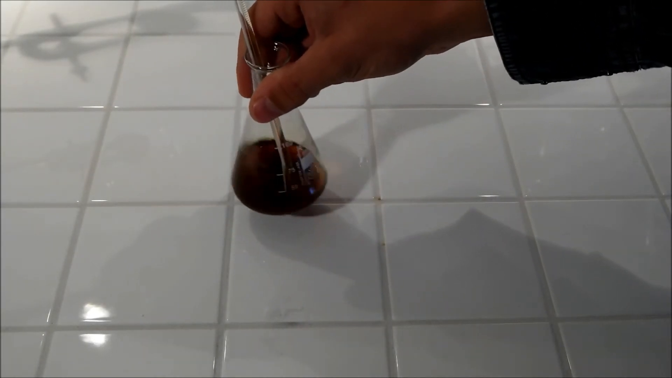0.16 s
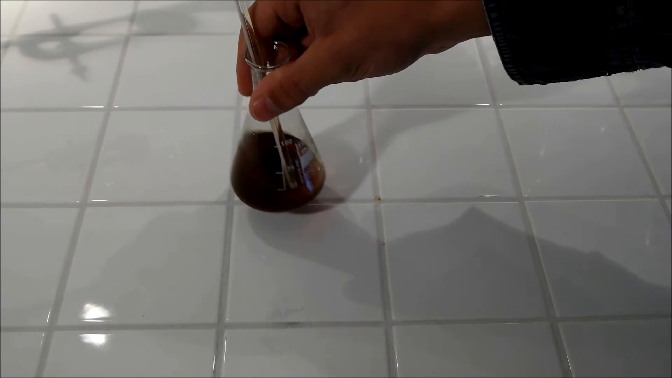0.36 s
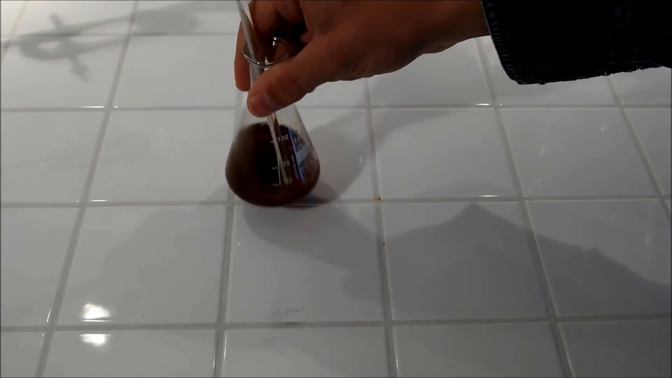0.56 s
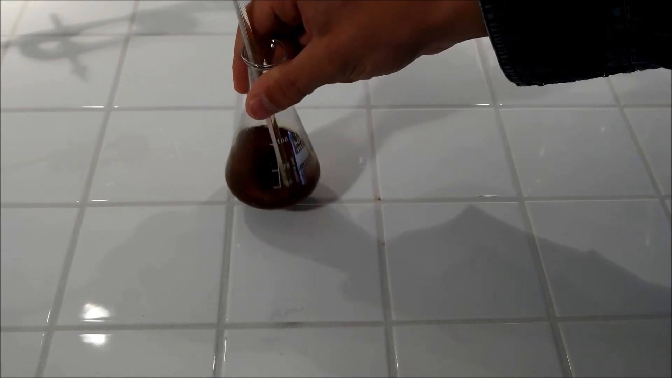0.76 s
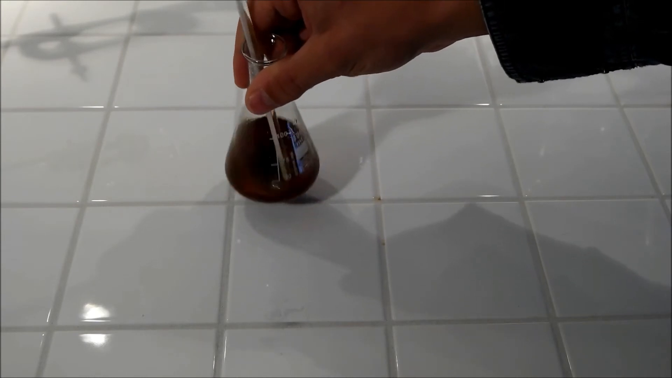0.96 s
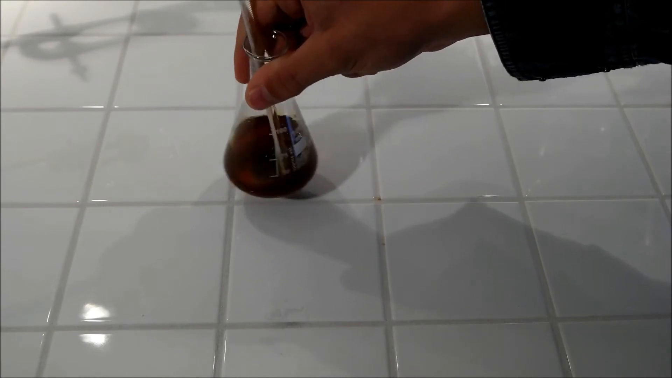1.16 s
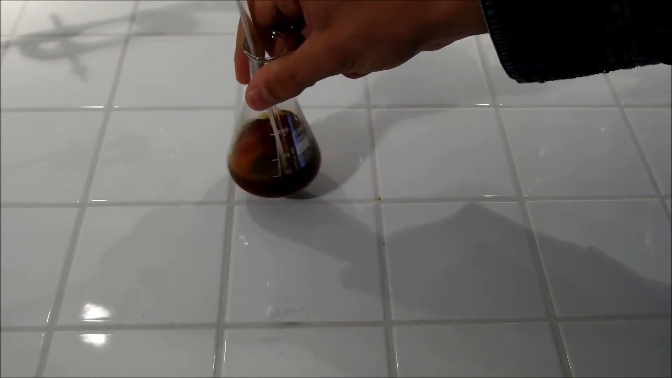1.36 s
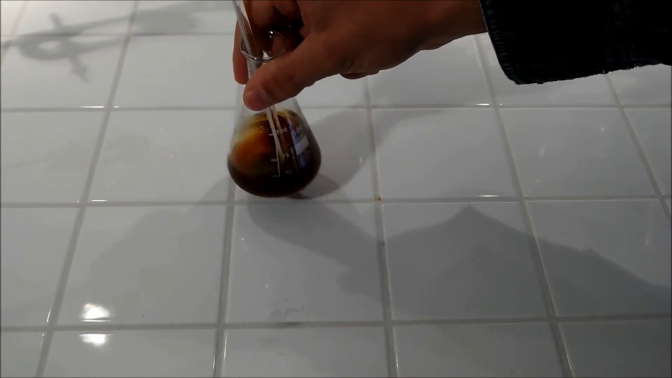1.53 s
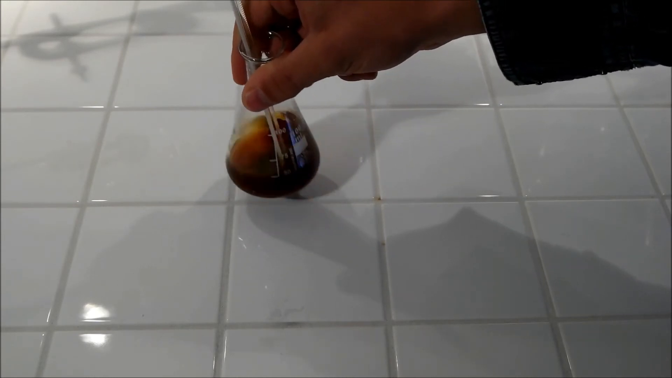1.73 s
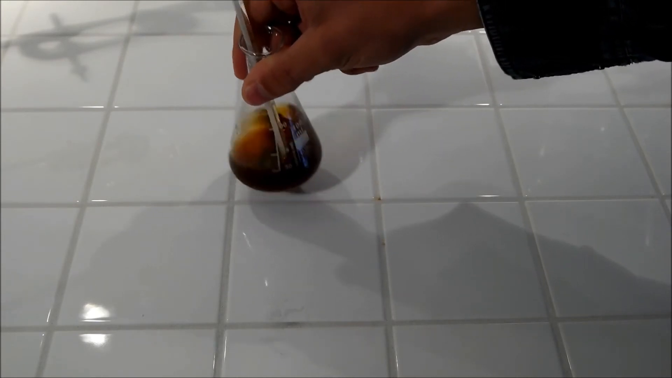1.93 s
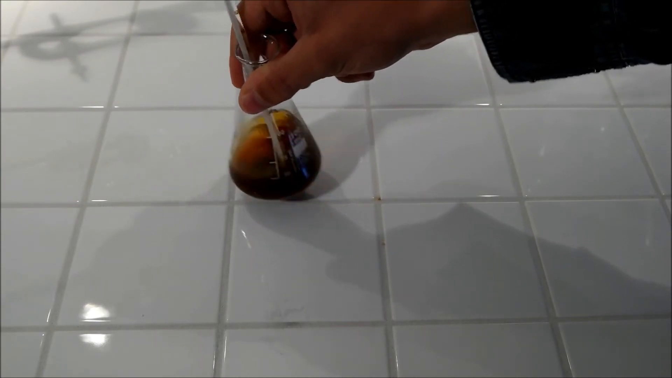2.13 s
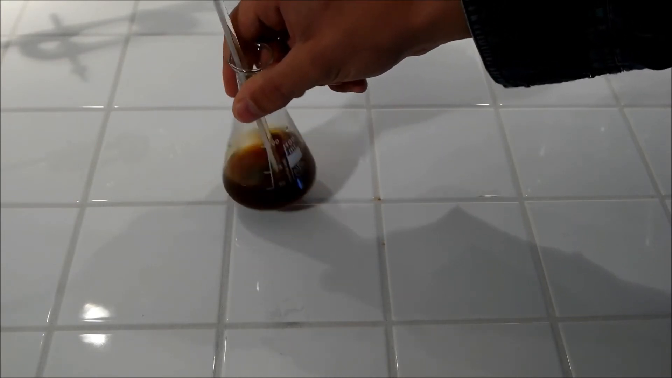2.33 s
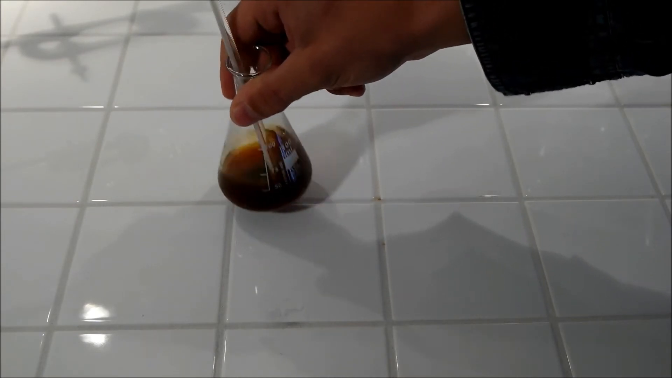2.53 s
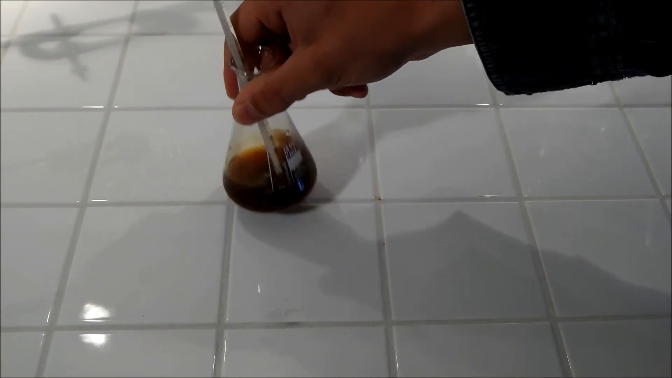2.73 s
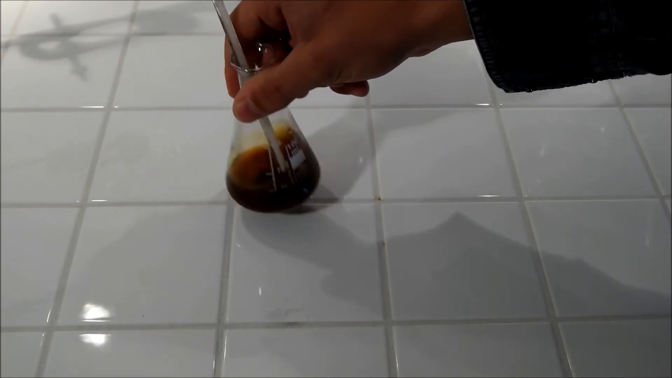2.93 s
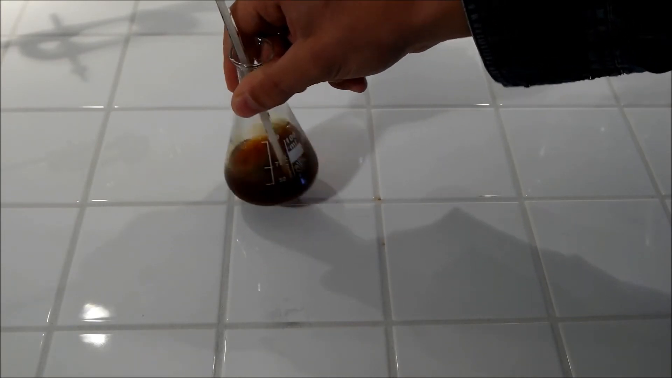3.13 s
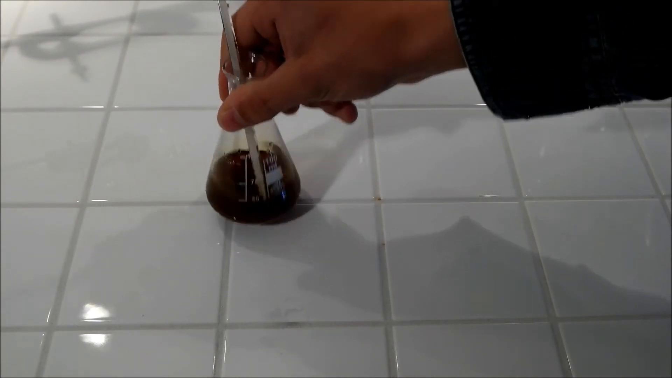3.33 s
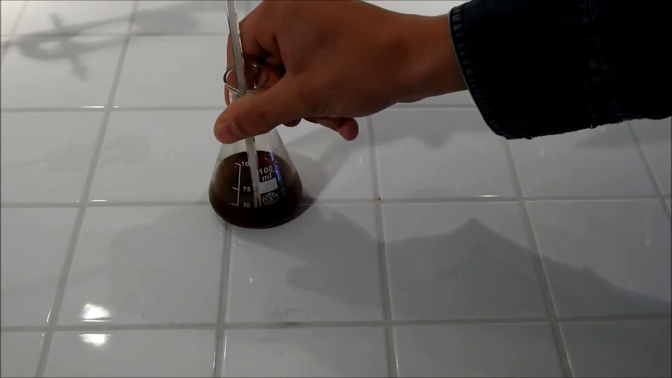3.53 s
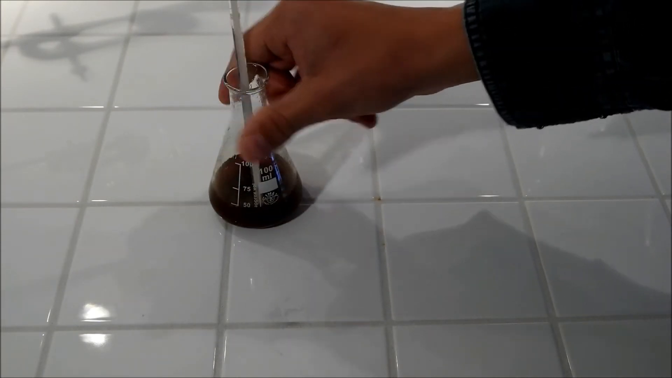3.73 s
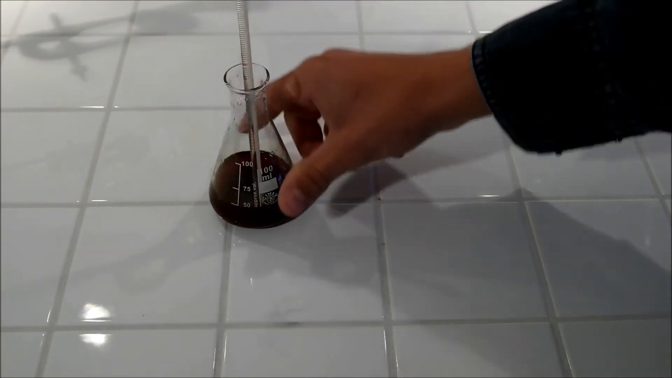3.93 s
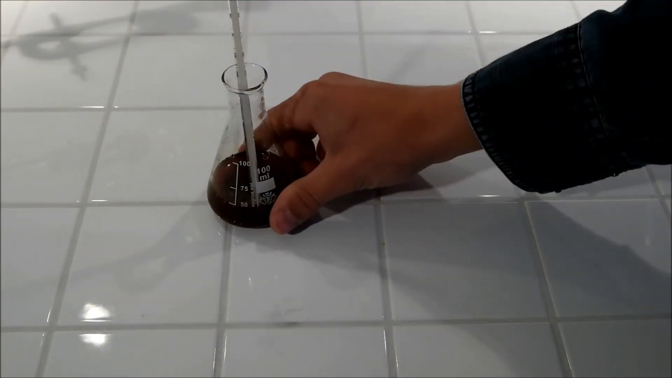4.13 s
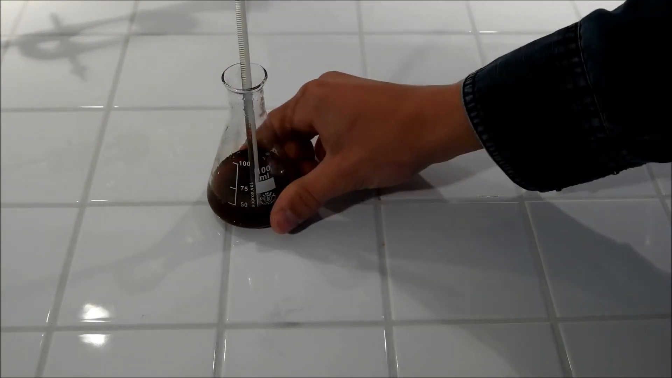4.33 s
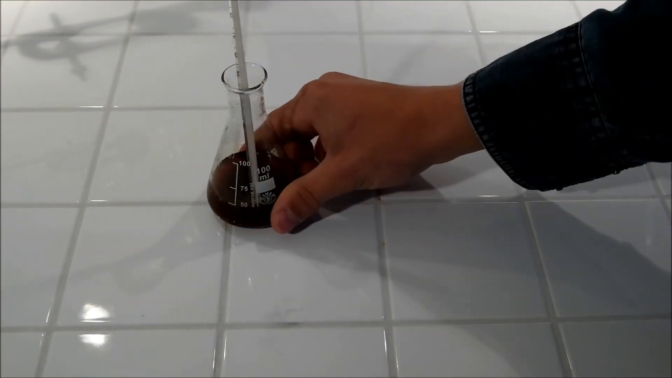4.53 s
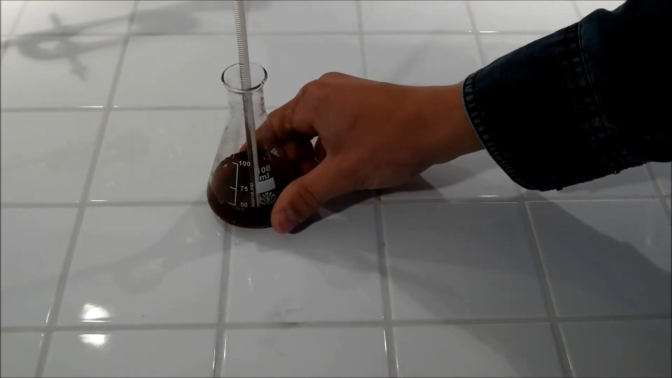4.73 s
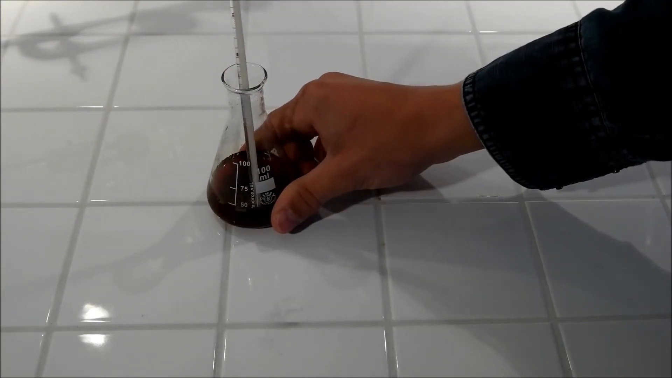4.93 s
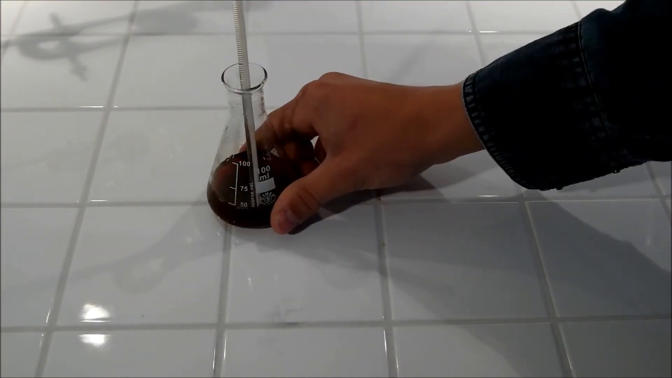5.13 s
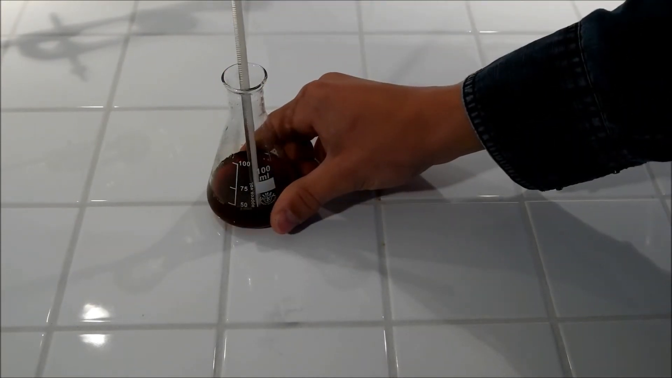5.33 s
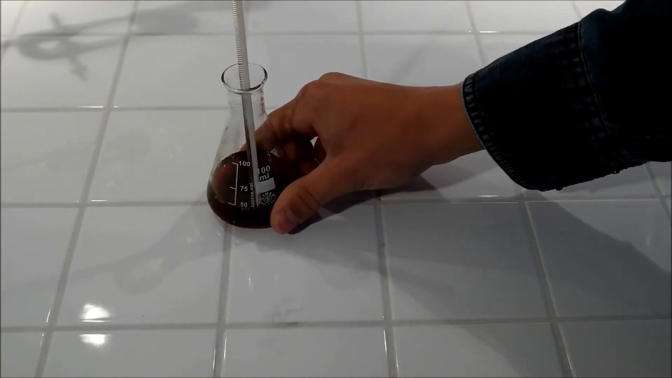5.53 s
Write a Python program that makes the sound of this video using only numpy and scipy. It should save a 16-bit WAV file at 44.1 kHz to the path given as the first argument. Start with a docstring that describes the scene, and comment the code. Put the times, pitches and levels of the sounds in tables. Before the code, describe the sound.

Small, bright glass-on-glass ticks come unevenly over quiet air noise and soft lapping liquid. Just before the middle they become firmer and more spaced, then a hard knock of glass base on tile dominates, followed by lighter taps and rim chatter. After that nothing is handled; a steady fan rush and faint hum fade slightly at the end. Close stereo pickup in a reflective room.

```python
"""A glass thermometer clinks against a conical flask of swirled liquid: bright contact bursts and short wall modes.
The flask is set down on a tiled lab bench: coloured knocks, ringing modes, a bench thump and a rolling rattle.
Flask and liquid plink as short sines rising slightly in pitch; the liquid sloshes as noise of uneven level.
A ventilation fan sounds as coloured noise over wavering hum lines.
The hard-walled room answers the contacts and plinks through a noise-built echo."""
import sys
import numpy as np
from scipy import signal
from scipy.fft import rfft, irfft, next_fast_len
from scipy.io import wavfile
from scipy.ndimage import uniform_filter1d

SR = 44100
rng = np.random.default_rng(int(sys.argv[2]) if len(sys.argv) > 2 else 0)


def store_wav(level_fs):
    """Save 16-bit WAV to argv[1]."""
    pcm = np.round(np.clip(np.atleast_2d(level_fs), -1, 1) * 32767)
    wavfile.write(sys.argv[1], SR, pcm.T.astype(np.int16))


N = 250309
FFT_SIZE = next_fast_len(N)
SWIRL_END_S = 1.4

# Flask base against the tiles. Each row: start in seconds, relative strength in dB, chatter length in seconds.
KNOCKS = [(3.5281, -7.5, 0.00008), (3.5301, -5, 0.00015), (3.531, -5.5, 0.0026), (3.5509, -21.5, 0.0079),
          (3.6427, -13.5, 0.009), (3.6504, -19.5, 0.008), (3.7826, -26, 0.0063), (3.8215, -25, 0.006),
          (3.841, -24, 0.012)]
# Colour of base on tile. Each row: frequency in Hz, relative density in dB per Hz.
THUD = [(40, -23.5), (150, -22.5), (260, -12.5), (400, -3), (520, -2), (660, -3.5), (820, -1), (1250, 0.5),
        (1500, -2), (1950, 2), (2700, 1), (3300, -5), (4200, -7.5), (5400, -16.5), (6700, -16.5),
        (7800, -22.5), (11000, -30), (12700, -41.5), (15500, -62)]
# Left-right likeness of contacts and steady noises. Each row: frequency in Hz, likeness from 0 to 1.
ALIKE = [(30, 0.97), (100, 0.26), (300, 0.399), (700, 0.42), (1300, 0.6), (2500, 0.2), (6000, 0.097),
         (14000, 0.23)]


def amp(db):
    """Decibels to gain."""
    return 10 ** (np.asarray(db) / 20)


def unit(x):
    """Scales to an rms of one."""
    return x / np.sqrt(np.mean(x ** 2) + 1e-20)


def read(points, hz):
    """Reads a table on a logarithmic frequency axis."""
    f, value = np.transpose(points)
    return np.interp(np.log(hz + 1), np.log(f + 1), value)


def add(mix, s, sound):
    """Adds a sound to the mix at time s."""
    part = mix[..., round(s * SR):][..., :sound.shape[-1]]
    part += sound[..., :part.shape[-1]]


def hold(db, until_s, fall_db_per_s):
    """Gain over the whole scene: a steady level, then an even fall in dB."""
    past_s = np.maximum(np.arange(N) / SR - until_s, 0)
    return amp(db - fall_db_per_s * past_s)


def pair(points, size):
    """Frequencies and spectra of two white noises, left and right as alike as the table says."""
    hz = np.fft.rfftfreq(size, 1 / SR)
    left, other = rfft(rng.standard_normal((2, size)))
    alike = np.clip(read(points, hz), -1, 1)
    right = other * np.sqrt(1 - alike ** 2) + left * alike
    return hz, np.array([left, right])


def even_burst(envelope, points, evenness, count=4):
    """Stereo noise under an envelope, its chance resonances partly smoothed out."""
    size = len(envelope)
    burst = irfft(pair(points, size)[1], size) * envelope
    energy = np.linalg.norm(burst)
    for _ in range(count):
        z = rfft(burst)
        flatter = z / (abs(z) + 1e-9) ** np.clip(evenness, 0, 1)
        burst = irfft(flatter, size) * envelope ** (1 / count)
    return burst * energy / np.linalg.norm(burst)


def pulse(colour, tilt_db_per_octave, pivot_hz, size=2048):
    """A minimum-phase click of unit energy with the given colour, tilted about the pivot."""
    hz = np.fft.rfftfreq(size, 1 / SR)
    octaves = np.log2(np.maximum(hz, pivot_hz / 10) / pivot_hz)
    log_gain = np.log(amp(read(colour, hz) + tilt_db_per_octave * octaves))
    circle = np.r_[log_gain, log_gain[-2:0:-1]]
    spectrum = np.exp(np.conj(signal.hilbert(circle)))
    click = np.fft.ifft(spectrum).real[:size // 2]
    return click / np.linalg.norm(click)


def contact(length_s, chatter_db, apart, evenness, size=2048):
    """Force of a first touch, then a dying buzz of rebounds that differs a little from side to side."""
    t = np.arange(size) / SR
    envelope = np.exp(-(t / max(length_s, 1e-4)) ** 2)
    buzz = even_burst(envelope, ALIKE, evenness)
    force = amp(chatter_db) * (apart * buzz + (1 - apart) * buzz.mean(0))
    force[:, 0] += 1
    return force


def strike(force, click):
    """A contact force played through the colour of the object, with unit energy on each side."""
    burst = signal.fftconvolve(force, click[None], axes=1)
    return burst / np.linalg.norm(burst, axis=1, keepdims=True)


def ring(modes, damping_per_s, spread_rad, detune):
    """Decaying modes with added damping; pitch and strength shift at random from blow to blow."""
    t = np.arange(SR // 2) / SR
    out = np.zeros((2, len(t)))
    for hz, db, t60 in modes:
        shift, uneven_db, side, phase = rng.standard_normal(4)
        turns = hz * (1 + detune * shift) * t + phase
        angle = 2 * np.pi * turns + spread_rad * side * np.array([[-1], [1]])
        decay = np.exp(-np.log(1000) * t * (1 / t60 + damping_per_s))
        out += amp(db + uneven_db) * decay * np.sin(angle)
    return out * (1 - np.exp(-t / 0.00044))


def diffused(response):
    """Evens out a one-second echo over frequency, so that no single resonance booms; keeps 0.75 s."""
    z = rfft(response)
    power = (abs(z) ** 2).mean(0)
    correction = np.sqrt(uniform_filter1d(power, size=700) / uniform_filter1d(power, size=70))
    return irfft(z * correction, SR)[:, :SR - SR // 4]


def room(x, wet_db, tilt_db, early_db=-4.5, early_s=0.016, build_s=0.0035):
    """Close reflections, then a diffuse tail that decays at a rate set by frequency."""
    # Each row: frequency in Hz, t60 in s.
    room_t60 = [(120, 0.97), (330, 0.18), (600, 0.38), (1500, 0.55), (4000, 0.43), (8000, 0.32),
                (13000, 0.5)]
    # Each row: frequency in Hz, relative reverberation level in dB.
    room_db = [(120, 5), (300, 7), (650, 3.5), (1200, -1), (2500, -7), (6000, -5.5), (12000, -13.5)]
    # Left-right likeness of the echo. Each row: frequency in Hz, likeness from 0 to 1.
    room_alike = [(100, .95), (350, 0.7), (800, 0.7), (1500, 0.4), (2500, .25), (14000, 0.1)]
    t = np.arange(SR) / SR
    noise = irfft(pair(room_alike, SR)[1], SR)
    hz, frame_s, z = signal.stft(noise, SR, nperseg=256)
    rate = np.log(1000) / read(room_t60, hz)[:, None]
    colour_db = read(room_db, hz) + tilt_db * np.log2(1 + hz / 2000)
    # the root evens the energy of long and short decays
    z = z * np.exp(-rate * frame_s) * np.sqrt(2 * rate / SR) * amp(colour_db)[:, None]
    tail = signal.istft(z, SR, nperseg=256)[1][:, :SR] * (1 - np.exp(-t / build_s))
    early = even_burst(np.exp(-t / early_s) * (t > .001), room_alike, evenness=0.94)
    early = early / np.linalg.norm(early, axis=1, keepdims=True)
    response = diffused(tail + amp(early_db) * early)
    return amp(wet_db) * signal.fftconvolve(x, response, axes=1)[:, :N]


def ventilation(waver_rad=0.89):
    """Rushing air as coloured noise over phase-wavering hum lines; steady, then fading at the end."""
    # Air noise. Each row: frequency in Hz, relative density in dB per Hz.
    air_colour = [(20, 0.6), (48, 0.86), (70, -3), (160, -.7), (350, -1.8), (560, 0), (750, -7.5),
                  (1050, -7.5), (1290, 1.69), (1480, -8.7), (3000, -11.7), (6000, -15.5), (14000, -24),
                  (16000, -44)]
    # Hum lines. Each row: frequency in Hz, rms level before the fade in dB.
    hum_lines = [(49, -69.5), (99, -73.5), (255, -79), (299, -71.5), (446, -72.5), (585, -73)]
    hz, z = pair(ALIKE, FFT_SIZE)
    t = np.arange(N) / SR
    swell = hold(-58, until_s=5.01, fall_db_per_s=9)
    hum = np.zeros(N)
    for line_hz, db in hum_lines:
        slow = rfft(rng.standard_normal(FFT_SIZE)) * np.exp(-hz / 3)
        drift = unit(irfft(slow, FFT_SIZE)[:N])
        hum += amp(db) * np.sqrt(2) * np.sin(2 * np.pi * line_hz * t + waver_rad * drift)
    air = unit(irfft(z * amp(read(air_colour, hz)), FFT_SIZE)[:, :N])
    return (air + hum / swell.max()) * swell


def slosh(lapping_db=3):
    """Liquid laps as unevenly swelling noise: steady in the swirl, then calming, jolted by the landing."""
    # Each row: frequency in Hz, relative density in dB per Hz.
    liquid_colour = [(100, -22.5), (280, -21), (480, 4.5), (800, -11.5), (1800, -22.5), (4000, -13),
                     (10000, -12.5), (15000, -35.5)]
    hz, z = pair(ALIKE, FFT_SIZE)
    laps = uniform_filter1d(rng.standard_normal(N), size=1200)
    laps = unit(uniform_filter1d(laps, size=800))
    landing_s = KNOCKS[0][0]
    swirl = hold(-69.5, SWIRL_END_S, fall_db_per_s=32)
    jolt = hold(-62.5, landing_s, fall_db_per_s=13.5) * (np.arange(N) / SR > landing_s)
    noise = irfft(z * amp(read(liquid_colour, hz)), FFT_SIZE)[:, :N]
    return unit(noise * amp(lapping_db * laps)) * (swirl + jolt)


def plinks(rise=0.0058, scatter_db=6):
    """Short plinks, rising slightly in pitch, from the swirled flask and its liquid; faint ones at random."""
    # The loudest plinks. Each row: start in seconds, initial pitch in Hz, relative level in dB.
    loudest = [(.248, 462, -41), (.255, 706, -41.5), (0.2688, 2870, -29.5), (.2705, 2320, -35),
               (0.513, 4270, -42), (.536, 6470, -50), (.741, 1590, -46.5), (1.166, 2850, -41),
               (1.5608, 2880, -39.5), (1.564, 3550, -48), (1.58, 6250, -50), (1.588, 1556, -41),
               (1.619, 1580, -54), (1.9835, 1730, -41), (2.0805, 6300, -43.5), (2.195, 2880, -41.5),
               (3.256, 2900, -49)]
    faint_per_s, faint_max_db, low_hz, high_hz = 3, -58, 1470, 6850
    t60_at_1khz_s, damping_power = 0.039, 0.55  # higher ones die sooner
    out, t = np.zeros((2, N)), np.arange(SR // 8) / SR
    faint = []
    for when, high, weak in rng.random((round(faint_per_s * SWIRL_END_S), 3)):
        pitch_hz = low_hz * (high_hz / low_hz) ** high
        faint.append((when * SWIRL_END_S, pitch_hz, faint_max_db - scatter_db * weak))
    for s, hz, db in loudest + faint:
        t60 = t60_at_1khz_s * (1000 / hz) ** damping_power
        turns = hz * (t + rise * t ** 2 / t60)
        envelope = np.exp(-np.log(1000) * t / t60) * (1 - np.exp(-turns / 2))
        add(out, s, amp(db) * np.sin(2 * np.pi * turns) * envelope)
    return out


def rattle(rattle_db=4):
    """The base rolls on its rim: a dense, fading run of tiny contacts with the tile."""
    # Each row: start in seconds, length in seconds, relative strength in dB.
    rolls = [(3.547, .09, -25.5), (3.654, .12, -27.5), (3.821, 0.063, -27.5)]
    rate_per_s, scatter_db, fade_db = 160, 5, -9
    out, click = np.zeros((2, N)), pulse(THUD, 0, pivot_hz=1950)
    for start, length, db in rolls:
        steps = np.arange(0, length, 1 / rate_per_s)
        for step, (jitter, uneven) in zip(steps, rng.standard_normal((len(steps), 2))):
            level_db = rattle_db + db + fade_db * step / length + scatter_db * uneven
            force = contact(0.00088, chatter_db=-4, apart=0.34, evenness=.3)
            add(out, start + step + .5 * jitter / rate_per_s, amp(level_db) * strike(force, click))
    return out


def flask(thud_db=14, ring_db=-27, bench_db=-8.5):
    """The base knocks on the tiles, duller when softer; modes ring and the first knock thumps the bench."""
    # Ringing of base, tile and room after a knock. Each row: frequency in Hz, relative level in dB, t60 in s.
    knock_modes = [(375.6, -13.5, .35), (472, -14, 0.22), (595, -15.5, .3), (713, -8, 0.2),
                   (850, -13, 0.24), (1004, -8.5, .24), (1268, -10.5, 0.32), (1337, -12, 0.23),
                   (1630, -10.5, .18), (1966, 3.5, 0.046), (2270, -3, 0.06), (2610, -6, .05),
                   (2790, -8, .12), (2939, -6.5, 0.11)]
    # Bench top. Each row: frequency in Hz, relative density in dB per Hz.
    bench_colour = [(30, -22), (85, -21), (150, -2), (200, -13), (280, 2.5), (370, 3.5), (500, 3.5),
                    (650, -11.5), (2000, -44.5), (16000, -84.5)]
    out = np.zeros((2, N))
    for s, db, length_s in KNOCKS:
        force = contact(length_s, chatter_db=-9.5, apart=0.27, evenness=0.32)
        click = pulse(THUD, 0.64 + 0.099 * db, pivot_hz=1963)
        add(out, s, amp(db + thud_db) * strike(force, click))
        add(out, s, amp(db + ring_db) * ring(knock_modes, 0, spread_rad=0.12, detune=0.0014))
    add(out, KNOCKS[0][0], amp(bench_db) * pulse(bench_colour, 0, pivot_hz=200, size=8192))
    return out


def favoured(hz):
    """The wall modes as struck at one spot: those near the given pitch are lifted."""
    # Flask wall, damped by the liquid. Each row: frequency in Hz, relative level in dB, t60 in s.
    wall_modes = [(1632, -20, .06), (1882, -10, .04), (2450, -10, 0.023), (2904, -4.5, 0.056),
                  (3250, -10, .03), (3698, -15, .1), (4050, -4.5, 0.079), (4130, -4, 0.044),
                  (4230, -3.5, .1), (4260, -6.5, .11), (4366, -3, .24), (4424, -4, .19), (4600, -2.5, .05),
                  (4720, -3, 0.043), (4810, -7, 0.038), (5400, -5.5, .025), (5660, -9, .08),
                  (5860, -11.5, 0.073), (6460, -9.5, 0.1), (6400, -11, 0.16), (6660, -12, .2),
                  (7160, -12.5, .06), (9900, -8.5, .08), (10690, -10.5, .05), (11600, -10, 0.12)]
    lift_db, width_hz = 11.5, 160
    return [(f, db + lift_db * np.exp(-((f - hz) / width_hz) ** 2), t60) for f, db, t60 in wall_modes]


def thermometer(tick_db=17.0, wall_db=-11.5, swirl_detune=0.005, rest_detune=0.00029):
    """Glass chatters on glass: a bright tick and a wall ring, damped and detuned while held in the hand."""
    # Clinks; the tick at 0.298 s is probably a bursting bubble or a drop. Each row: start in seconds,
    # relative strength in dB, wall ring relative to the tick in dB, pitch favoured by the spot in Hz.
    clinks = [(0.2688, -39, -2, 3150), (.298, -47.5, 14, 5400), (0.3072, -32.5, 3, 10000),
              (0.761, -52, -15, 4400), (0.948, -48.5, 10.5, 4780), (1.1179, -40, -1, 1880),
              (1.1593, -42, -2, 4850), (1.3714, -26.5, -1, 5830), (1.3804, -33.5, 1, 1880),
              (1.539, -41.5, 0, 10690), (1.588, -41.5, -10, 1630), (1.7601, -36.5, -2, 1880),
              (1.811, -55, 8, 6300), (1.951, -40, -10, 4280), (2.168, -49.5, -16, 4400),
              (2.181, -54, 2, 10000), (2.2006, -42.5, 2, 10000), (2.2852, -53, -8, 4430),
              (2.6062, -27, -1, 1880), (2.732, -55, 3.5, 4360), (2.8243, -22, 2, 3943),
              (3.01, -22.5, -3, 6500), (3.171, -30.5, -6, 4200), (3.212, -40.5, 7, 4140),
              (3.4423, -41, -0.5, 4110), (3.529, -29.5, -5.5, 4135), (3.567, -38, -2.5, 6660),
              (3.645, -38, 9, 6620), (3.653, -39, 7, 4230), (3.8, -44.5, 1, 6800), (3.839, -41, 3, 6830),
              (3.843, -35, -0.5, 4430)]
    # Each row: frequency in Hz, relative density in dB per Hz.
    tick_colour = [(150, -25), (450, -10.5), (900, -13.5), (1400, -6.5), (1950, 3.5), (2500, -4),
                   (3000, -0.5), (3550, -3.5), (4200, 5.5), (4700, 3), (5250, -6), (6200, 2.5), (6900, -2),
                   (7600, -4.5), (9000, -6), (10600, 1.5), (12000, -3), (13500, -14), (16000, -38.5)]
    usual_db, usual_chatter_s, doubling_db = -38, 0.0075, 14  # harder clinks chatter longer
    firm_tilt_db_per_octave, graze_db, thinning_per_octave = -1, -45.5, 1.0  # grazes sound thinner
    grip_damping_per_s, let_go_s, regrip_s, mute_db_per_s = 12, 3.75, 3.93, 245
    out = np.zeros((2, N))
    for s, db, ring_db, ring_hz in clinks:
        chatter_s = usual_chatter_s * 2 ** ((db - usual_db) / doubling_db)
        force = contact(chatter_s, chatter_db=-3.5, apart=0.73, evenness=0.11)
        tilt = firm_tilt_db_per_octave + thinning_per_octave * max(graze_db - db, 0)
        damping, detune = (grip_damping_per_s, swirl_detune) if s < let_go_s else (0, rest_detune)
        tick = strike(force, pulse(tick_colour, tilt, pivot_hz=4560))
        wall = ring(favoured(ring_hz), damping, spread_rad=0.25, detune=detune)
        add(out, s, amp(db + tick_db) * tick)
        add(out, s, amp(db + ring_db + wall_db) * wall)
    return out * hold(0, regrip_s, mute_db_per_s)


def scene(left_db=0.5, clink_room_db=1.0, clink_tilt_db=0.45, knock_room_db=0.0, knock_tilt_db=0.0):
    """A little to the left; the room answers clinks and plinks differently from knocks and rattle."""
    background = slosh() + ventilation()
    glass = thermometer() + plinks()
    landing = flask() + rattle()
    echoes = room(glass, clink_room_db, clink_tilt_db) + room(landing, knock_room_db, knock_tilt_db)
    return (glass + landing + echoes) * amp([[left_db], [-left_db]]) + background


def record(dry):
    """Clips at full scale, then limits the band."""
    lowpass = signal.firwin(255, 15800, window=("kaiser", 9), fs=SR)
    return signal.oaconvolve(np.clip(dry, -1, 1), lowpass[None], "same")


dry = scene()
out = record(dry)
store_wav(out)
```